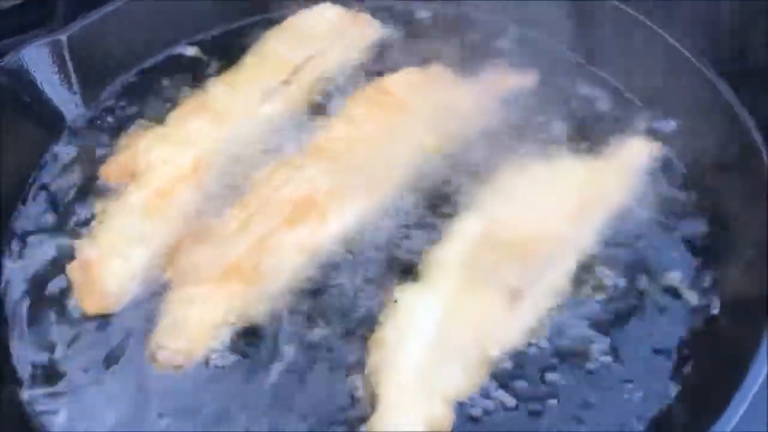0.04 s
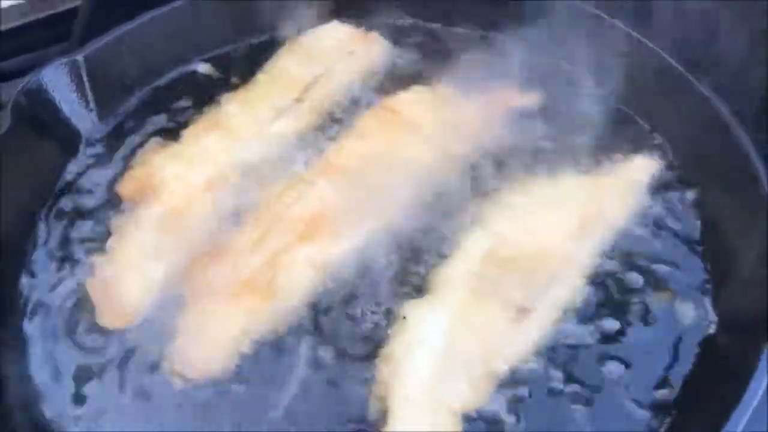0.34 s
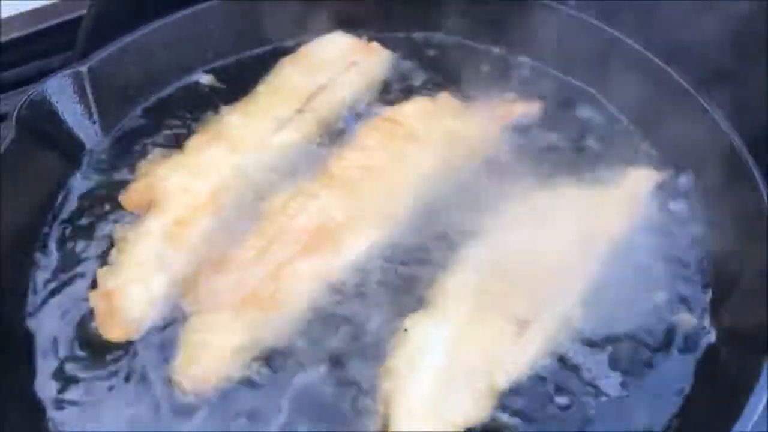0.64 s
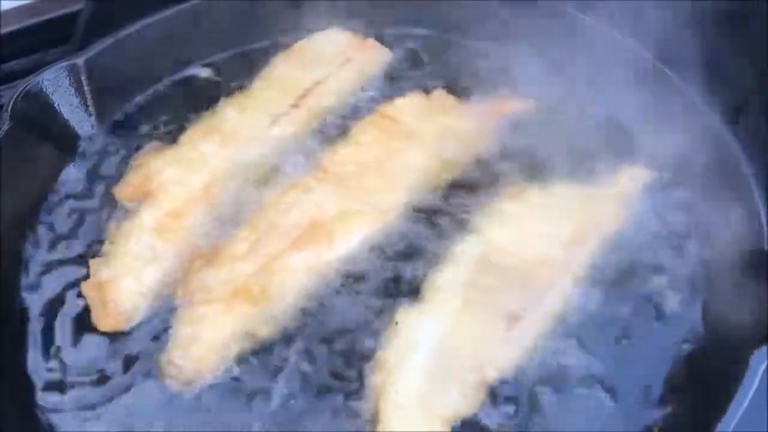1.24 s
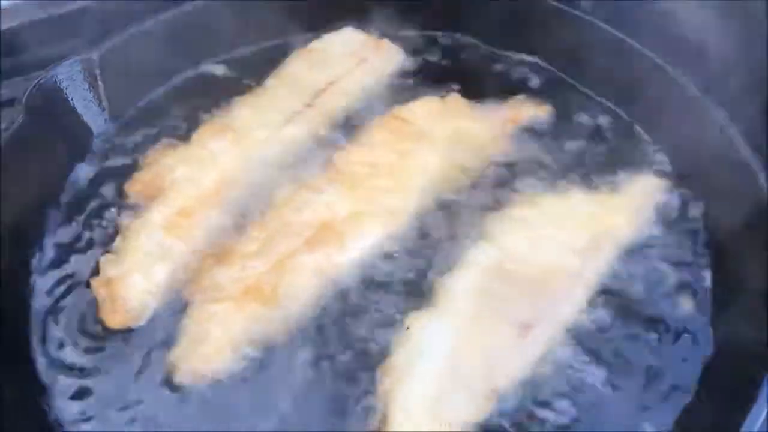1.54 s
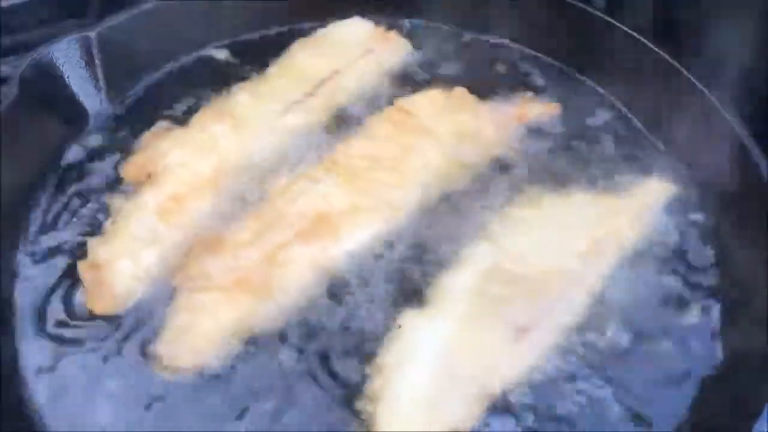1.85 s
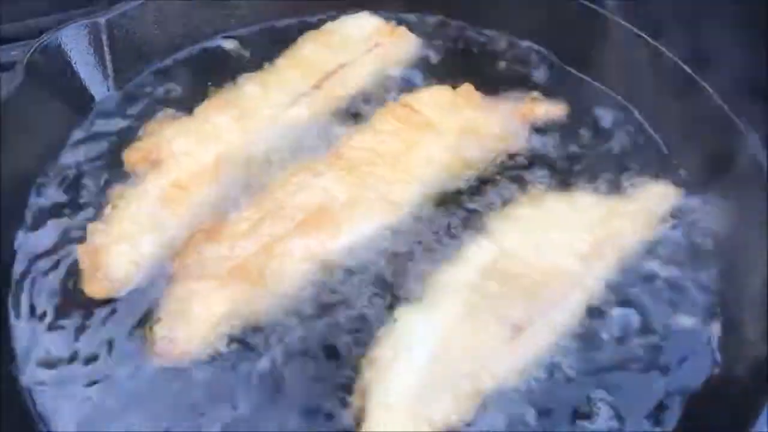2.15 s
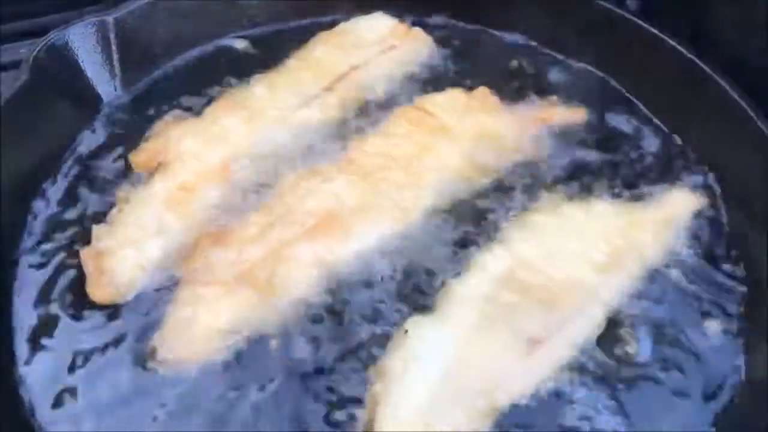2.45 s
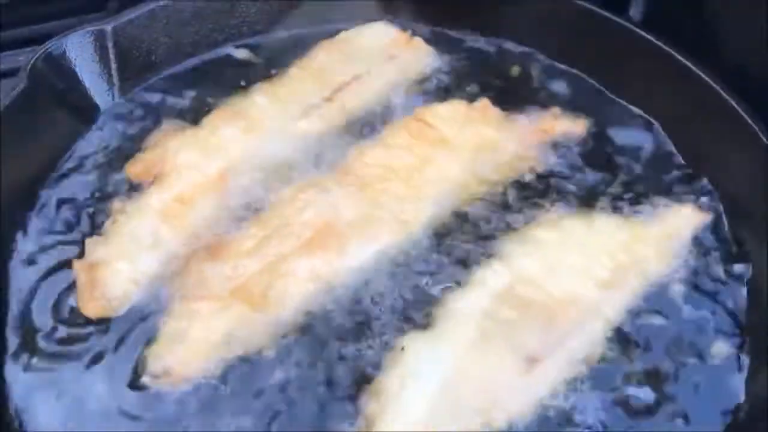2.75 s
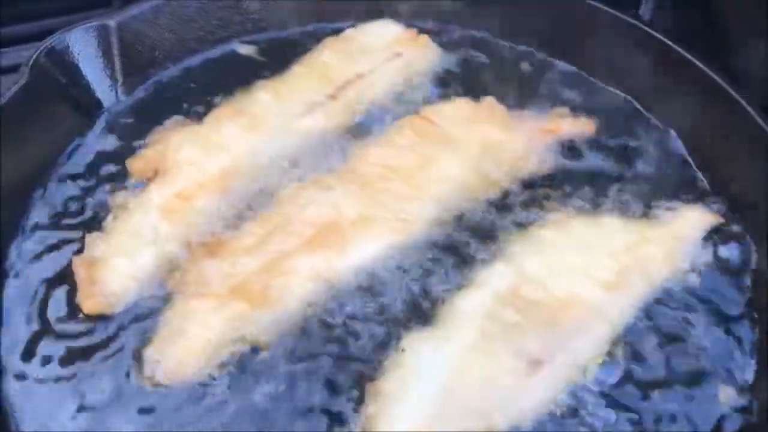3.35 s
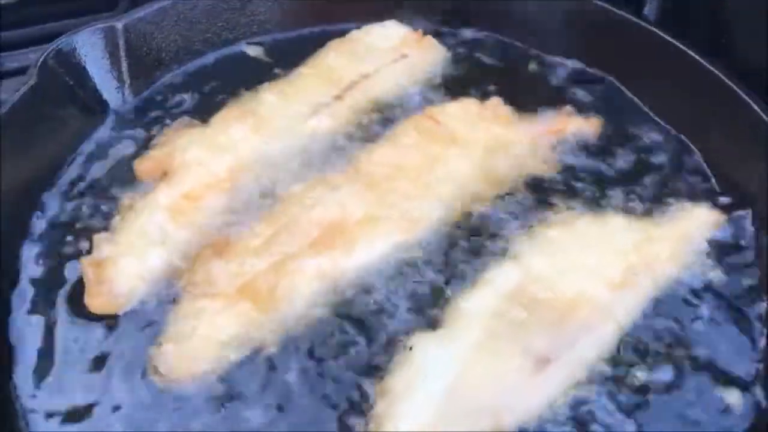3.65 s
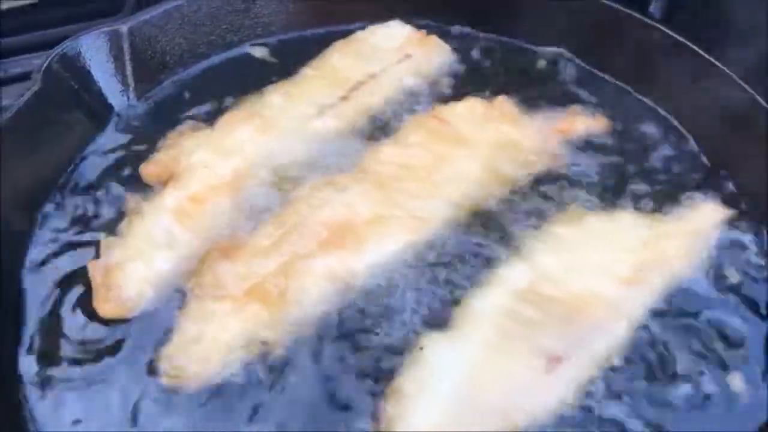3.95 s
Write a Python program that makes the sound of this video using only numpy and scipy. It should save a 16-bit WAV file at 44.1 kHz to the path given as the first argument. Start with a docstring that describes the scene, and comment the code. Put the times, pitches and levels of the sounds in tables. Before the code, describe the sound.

Battered fish sizzles in hot oil in an iron pan, heard up close in a kitchen. The steady hiss is dotted throughout with bubbling pops and sharp crackles, and flares briefly now and then over a faint low rumble.

```python
"""Battered fish fries in a cast-iron pan of hot oil, heard up close in a kitchen.
From the start, countless tiny bursts merge into a sizzle over a low rumble. Steam bubbles pop as short
pitched plops, water droplets flash into sharp ticks, and both set the pan ringing. From half a second
on, the sizzle flares now and then as wet spots meet the oil. Near 1.5 s, between two soft thumps,
the biggest bubble knocks the pan; the frying carries on to the end."""
import sys
import numpy as np
from scipy import signal
from scipy.fft import rfft, irfft
from scipy.io import wavfile

SR = 44100
rng = np.random.default_rng(int(sys.argv[2]) if len(sys.argv) > 2 else 0)


def log_audio(samples):
    """Write samples as a 16-bit WAV file to the path given in sys.argv[1]."""
    # one column per channel
    frames = np.atleast_2d(samples).T
    # limit to full scale, then quantise
    limited = np.clip(frames, -1, 1)
    pcm = np.round(limited * 32767).astype(np.int16)
    wavfile.write(sys.argv[1], SR, pcm)


N = 176400


def undb(db):
    """Decibels to gain."""
    return 10 ** (np.asarray(db) / 20)


def level(x, db):
    """Scale to an rms level."""
    return x * undb(db) / np.sqrt(np.mean(x ** 2))


def colour(x, points):
    """EQ a sound along a curve of (freq_hz, gain_db) points."""
    hz, db = np.array(points, float).T
    bins_hz = np.maximum(np.fft.rfftfreq(len(x), 1 / SR), 1)
    curve_db = np.interp(np.log(bins_hz), np.log(hz), db)
    return irfft(rfft(x) * undb(curve_db), len(x))


def add(out, start_s, sound):
    """Mix a short sound in at a time."""
    i = int(np.clip(start_s * SR, 0, N - 1))
    out[i:i + len(sound)] += sound[:N - i]


def burst(hz, swell_ms, rise=0):
    """A few cycles that swell and die, and their envelope; rise is the relative pitch climb per swell."""
    swell_s = swell_ms / 1000
    t = np.arange(int(9 * swell_s * SR) + 2) / SR
    age = t / swell_s
    env = (age * np.exp(1 - age)) ** 2
    cycles = hz * (t - swell_s) * (1 + rise * (age - 1) / 2)
    return env * np.sin(2 * np.pi * (cycles + rng.random())), env


def tail(t60_s, delay_ms):
    """Diffuse decaying reflections of unit energy."""
    t = np.arange(N // 4) / SR
    echoes = rng.standard_normal(len(t)) * np.exp(-np.log(1000) * t / t60_s) * (t * 1000 > delay_ms)
    return echoes / np.sqrt(np.sum(echoes ** 2))


def chance_events(per_s, pool=6000):
    """Random times, each with two normal draws for pitch and strength."""
    times, draws = rng.random(pool) * N / SR, rng.standard_normal((pool, 2))
    return np.column_stack([times, draws])[:int(per_s * N / SR)]


def sizzle_db(t):
    """How hard the oil sizzles: a slow drift around 0 dB, flaring when a wet spot meets the oil."""
    # drift of the sizzle, taken relative to its mean: time_s, level_db
    drift = [(0.0, -38.5), (0.15, -36), (0.29, -41), (0.67, -37), (0.89, -37.5), (1.58, -40), (1.99, -37.5),
             (2.57, -41), (2.68, -38), (3.1, -41), (3.89, -36), (4.0, -37.5)]
    # wet spots sputtering: peak_s
    sputters = [.52, .875, 1.77, 2.15, 2.32, 2.85, 3.26]
    flare_db, flare_s = 5, .025
    times, db = np.array(drift).T
    flares = sum(np.exp(-((t - peak_s) / flare_s) ** 2) for peak_s in sputters)
    return np.interp(t, times, db - db.mean()) + flare_db * flares


def fizz(per_s=7000, spread_db=8.5):
    """Thousands of tiny bursts along the batter merge into a hiss."""
    # tone of the hiss: freq_hz, gain_db
    fizz_eq = [(20, -45), (60, -13), (150, -9), (400, 1.5), (800, 5.5), (1400, 6.5), (2600, -4.5),
               (4500, -1.5), (7000, -2.5), (11000, -1), (16000, -3)]
    clicks = (rng.random(N) < per_s / SR) * rng.choice([-1, 1], N)
    grains = clicks * undb(spread_db * rng.standard_normal(N))
    return level(colour(grains, fizz_eq), db=-42) * undb(sizzle_db(np.arange(N) / SR))


def rumble():
    """A low bed of noise with two soft thumps."""
    # tone of the bed: freq_hz, gain_db
    rumble_eq = [(20, -42), (35, -32), (50, -2), (62, 1), (80, -1), (110, -5), (200, -6), (400, -8),
                 (800, -13.5), (3000, -36.5)]
    # low thumps: start_s, pitch_hz, level_db, swell_ms
    thumps = [(1.392, 74, -41.5, 10.6), (1.668, 81, -35, 14)]
    out = level(colour(rng.standard_normal(N), rumble_eq), db=-49.5)
    for start_s, hz, db, swell_ms in thumps:
        add(out, start_s, undb(db) * burst(hz, swell_ms)[0])
    return out


def bubbles(spot_count=12, slosh_samples=1600):
    """Steam bubbles around the pan: each cavity rings as its skin tears, then the oil closes over it."""
    # the louder plops: start_s, pitch_hz, level_db, swell_ms
    big_bubbles = [(0.025, 1810, -24, 0.91), (0.0645, 2780, -14.5, 0.42), (0.133, 2220, -24, 1.3),
                   (0.1692, 2680, -12, 0.96), (0.1881, 2380, -16.0, 0.76), (0.2092, 3470, -20, 0.49),
                   (0.2596, 2500, -14, 0.55), (0.324, 2300, -18.9, 0.92), (0.3338, 2320, -10, 0.41),
                   (0.3414, 2270, -18, 0.4), (0.3779, 4260, -26, 0.99), (0.378, 2130, -22.5, 1.0),
                   (0.439, 2400, -18, 1.2), (0.446, 1100, -22, 0.92), (0.4525, 2270, -19, 1.06),
                   (0.4626, 3600, -22, 0.65), (0.517, 4450, -21.5, 1.2), (0.52, 2340, -22.5, 0.97),
                   (0.5375, 2930, -22, 0.82), (0.536, 1590, -28.5, 2.8), (0.6375, 1420, -16.5, 1.07),
                   (0.6581, 3230, -12.5, 0.9), (0.6849, 1470, -20.8, 1.27), (0.707, 3200, -11.5, 0.35),
                   (0.79, 1960, -29.5, 4.4), (0.79, 2500, -15.5, 0.51), (0.8125, 2980, -12.5, 0.59),
                   (0.872, 1260, -22.5, 1.48), (0.9422, 2900, -29, 0.63), (0.9791, 2050, -18.5, 0.81),
                   (1.0191, 4800, -21.7, 0.71), (1.06, 2330, -21, 0.83), (1.187, 3000, -12.5, 0.46),
                   (1.193, 1930, -26.5, 3.05), (1.1927, 1570, -23, 1.5), (1.2472, 2240, -21.5, 0.77),
                   (1.2655, 2840, -16.5, 0.71), (1.2734, 2570, -22, 1.15), (1.29, 4000, -24, 0.88),
                   (1.4375, 1680, -15, 0.35), (1.446, 3060, -20.5, 0.44), (1.4799, 1230, -11, 0.86),
                   (1.5118, 2090, -21, 0.61), (1.5174, 2840, -21.5, 1.16), (1.5499, 2570, -21, 1.2),
                   (1.591, 4470, -21.2, 1), (1.6082, 2710, -21, 1.2), (1.6547, 2750, -18, 0.73),
                   (1.6677, 1980, -23, 0.67), (1.6996, 3000, -19.5, 0.67), (1.795, 1890, -21.6, 1.7),
                   (1.8245, 2330, -21.1, 0.55), (1.8412, 2900, -13.4, 0.76), (1.8734, 4140, -23, 0.8),
                   (1.9724, 3040, -18, 0.59), (1.9797, 2700, -13.5, 0.56), (1.985, 2080, -35, 4.7),
                   (2.0211, 1460, -23, 0.71), (2.056, 1880, -27, 4.1), (2.1082, 2230, -13, 0.52),
                   (2.1365, 2250, -12, 0.49), (2.155, 2930, -15.5, 0.5), (2.216, 3530, -14.5, 0.31),
                   (2.2734, 2800, -20, 0.64), (2.3886, 3080, -11.5, 0.33), (2.4819, 1310, -18.5, 0.67),
                   (2.482, 1920, -28, 2.5), (2.529, 2500, -19.4, 0.57), (2.5625, 2680, -15, 0.73),
                   (2.6305, 3030, -21, 0.95), (2.633, 2430, -21.5, 1.3), (2.7301, 3160, -17, 0.51),
                   (2.7409, 2420, -16, 1.3), (2.808, 2220, -26, 2.4), (2.809, 1890, -28, 4.3),
                   (2.8273, 2670, -17, 0.71), (2.839, 1950, -19, 1.3), (2.8567, 1800, -14.5, 0.53),
                   (2.8697, 3220, -15.5, 0.45), (2.925, 3100, -24, 0.97), (3.0777, 3400, -15.5, 1.06),
                   (3.101, 3030, -19, 0.9), (3.1012, 1370, -17.5, 0.94), (3.1459, 2170, -12.5, 0.72),
                   (3.1522, 1910, -20, 0.44), (3.166, 1210, -18, 0.79), (3.167, 3070, -21.5, 0.71),
                   (3.2719, 2610, -19.5, 0.94), (3.329, 2530, -19, 0.66), (3.4152, 3220, -12, 0.66),
                   (3.4288, 2640, -21.5, 1.1), (3.4365, 3240, -27, 0.62), (3.5226, 1620, -18, 0.59),
                   (3.5811, 2710, -14, 0.82), (3.606, 2220, -18.5, 0.44), (3.626, 3380, -21, 1.0),
                   (3.6643, 1490, -19.5, 0.86), (3.666, 1650, -25.5, 2.6), (3.7374, 2210, -19.5, 0.86),
                   (3.826, 1550, -27, 0.58), (3.92, 5400, -21.5, 1.1), (3.9365, 2690, -16, 1.08),
                   (3.9763, 4500, -15.5, 0.56)]
    # dull tone of the closing oil: freq_hz, gain_db
    slosh_eq = [(40, -6), (150, -6), (400, 3.5), (700, -2.5), (1500, -15.5), (5000, -79)]
    skin_eq = [(40, -15), (250, -3.5), (1500, 21.5), (5000, 18.5), (16000, -9)]
    small_hz, slosh_ms = 3415, 7
    skin = undb(-23) * colour(rng.standard_normal(2 * N), skin_eq)
    slosh = level(colour(rng.standard_normal(2 * N), slosh_eq), db=-23)
    closing = np.exp(-np.arange(slosh_samples) / SR * 1000 / slosh_ms)
    plops = list(big_bubbles)
    for start_s, pitch, strength in chance_events(per_s=260):  # small, quiet bubbles
        hz = np.clip(small_hz * 2 ** (0.68 * pitch), 1400, 9000)
        db = min(-34.5 + 9 * strength, -28)
        plops.append((start_s, hz, db, 0.707 * np.sqrt(small_hz / hz)))
    spots = np.zeros((spot_count, N))
    for k, (start_s, hz, db, swell_ms) in enumerate(plops):
        rise = .012 * min(1, 1500 / (hz * swell_ms)) ** 2  # less in bubbles that ring long
        tone, env = burst(hz, swell_ms, rise)
        spot, i = spots[k % spot_count], int(start_s * SR)
        add(spot, start_s, undb(db) * (tone + env * skin[i:i + len(env)]))
        size_db = -9 * max(np.log2(hz / 1360), 0)  # smaller, higher bubbles slosh less
        add(spot, start_s, undb(db + size_db) * closing * slosh[i:i + slosh_samples])
    return spots


def droplets(puff_samples=384, snap_at=128):
    """Water flashes to steam: a hiss swells, snaps with a few very high cycles and sprays away."""
    # the louder ticks, before their boost: snap_s, pitch_hz, level_db
    loud_ticks = [(0.1373, 9200, -22), (0.2788, 13800, -21.5), (0.2893, 10100, -23), (0.4352, 10200, -17),
                  (0.5188, 13700, -19), (0.5348, 12600, -18.5), (0.6057, 11100, -18.5), (0.647, 11900, -23),
                  (0.7392, 13400, -21), (0.7445, 14000, -17.5), (0.875, 10700, -24), (0.8836, 9200, -20),
                  (0.8883, 11800, -25), (0.9477, 11700, -18), (1.151, 9600, -18.5), (1.2193, 11500, -21),
                  (1.252, 8000, -19), (1.271, 10400, -24), (1.316, 14500, -20), (1.338, 11000, -18.5),
                  (1.5336, 12100, -19), (1.6024, 14500, -20.5), (1.7149, 10700, -25), (1.7733, 7050, -17.5),
                  (1.8733, 7700, -17.5), (2.0468, 11900, -21), (2.2572, 14000, -13), (2.321, 12200, -19.5),
                  (2.33, 10900, -21), (2.5238, 13400, -20.5), (2.5848, 12000, -17.5),
                  (2.6391, 11400, -19.5), (2.6905, 13300, -22.5), (2.7426, 10300, -21),
                  (2.7903, 10700, -22.5), (2.8387, 14700, -12), (2.9498, 10800, -24.5),
                  (3.0595, 10800, -19.5), (3.1206, 10200, -25), (3.136, 11900, -11), (3.1511, 12200, -17.5),
                  (3.1812, 12000, -17.5), (3.2268, 14000, -17), (3.2534, 11700, -20), (3.2668, 12300, -27),
                  (3.2732, 13400, -19.5), (3.4186, 12300, -13.5), (3.4736, 13300, -20),
                  (3.6513, 13700, -18), (3.7229, 11200, -17), (3.7927, 14600, -18), (3.8403, 11700, -14.5),
                  (3.9623, 14200, -17), (3.9736, 11100, -15.5)]
    boost_db, snap_db = 10, -5.5
    tick_swell_ms, lead_ms, spray_ms = 0.061, 0.56, 0.71
    tones, spray, hiss = np.zeros(N), np.zeros(N), rng.standard_normal(2 * N)
    ms = (np.arange(puff_samples) - snap_at) / SR * 1000
    lead = undb(-25) * np.exp(-abs(ms) / lead_ms)  # steam escapes just before the snap
    puff = np.where(ms < 0, lead, undb(-7.5) * np.exp(-abs(ms) / spray_ms))
    ticks = [(snap_s, hz, db + boost_db, tick_swell_ms) for snap_s, hz, db in loud_ticks]
    # a fine crackle follows the sizzle; its longer ticks peak lower
    stretches = 2 ** (0.94 * abs(rng.standard_normal(N // 5)))
    for (snap_s, pitch, strength), stretch in zip(chance_events(per_s=520), stretches):
        hz = np.clip(10700 * 2 ** (.45 * pitch), 4000, 15500)
        db = min(-30.5 + 8 * strength + sizzle_db(snap_s), -17) - 10 * np.log10(stretch)
        ticks.append((snap_s, hz, db, tick_swell_ms * stretch))
    for (snap_s, hz, db, swell_ms), polarity in zip(ticks, rng.choice([-1, 1], N)):
        spit = puff * hiss[int(snap_s * SR):][:puff_samples]
        spit[snap_at] += undb(snap_db) * polarity
        add(spray, snap_s - snap_at / SR, undb(db) * spit)
        add(tones, snap_s - swell_ms / 1000, undb(db) * burst(hz, swell_ms)[0])
    # bright tone of snap and spray: freq_hz, gain_db
    spray_eq = [(150, -22), (700, -7), (2000, -5), (5000, 0), (10000, -3), (16000, -1.5)]
    return tones + colour(spray, spray_eq)


def pan_ring(pops, boost_db=2):
    """The iron rings faintly in its own modes after each pop."""
    # modes of the pan, before the boost: pitch_hz, gain_db, t60_s
    modes = [(468, -1, .4), (911, 1, .6), (1179, 1, .7), (1260, -9, .16), (1340, -12, .16), (1493, -13, .3),
             (1883, -4, .25), (1977, -3, .35), (2108, -6, .25), (2560, -11, .15)]
    t = np.arange(N // 4) / SR
    ring = 0
    for hz, db, t60_s in modes:
        decay = np.log(1000) / t60_s
        gain = undb(db + boost_db) * 2 * decay / SR
        ring += gain * np.exp(-decay * t) * np.cos(2 * np.pi * hz * t)
    return signal.fftconvolve(pops, ring)[:N]


def reflections(spots):
    """Early echoes off pan wall and stove, then the kitchen; each spot in the pan has its own."""
    # tone of all the echoes: freq_hz, gain_db
    echo_eq = [(150, -15.5), (400, -5.5), (700, 3), (1300, -0.5), (2400, -0.5), (3500, -5), (6000, -5),
               (10000, -15), (16000, -2)]
    wet = np.zeros(N)
    for spot in spots:
        early = undb(-5) * tail(t60_s=0.039, delay_ms=1.8)
        kitchen = undb(-12.5) * tail(t60_s=0.4, delay_ms=11)
        wet += signal.fftconvolve(spot, early + kitchen)[:N]
    return colour(wet, echo_eq)


def knock():
    """The push that the biggest bubble gives the pan, heard only through the pan's modes."""
    out = np.zeros(N)
    add(out, start_s=1.48, sound=undb(-5) * burst(hz=1080, swell_ms=.9)[0])
    return out


def scene():
    """Mono mix: pops, pan ring and echoes over a bed of sizzle and rumble."""
    bed = fizz() + rumble()
    spots = [*bubbles(), droplets()]
    pops = sum(spots)
    return (pops + pan_ring(pops + knock()) + reflections(spots) + bed)[None]


def record(dry):
    """A steep low-pass trims the very top."""
    top_hz = 15950
    return signal.sosfilt(signal.ellip(8, .2, 70, top_hz, fs=SR, output="sos"), dry)


dry = scene()
out = record(dry)
log_audio(out)
```